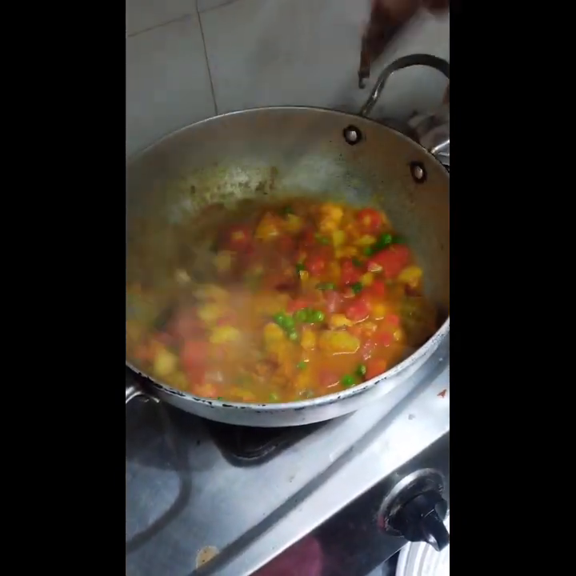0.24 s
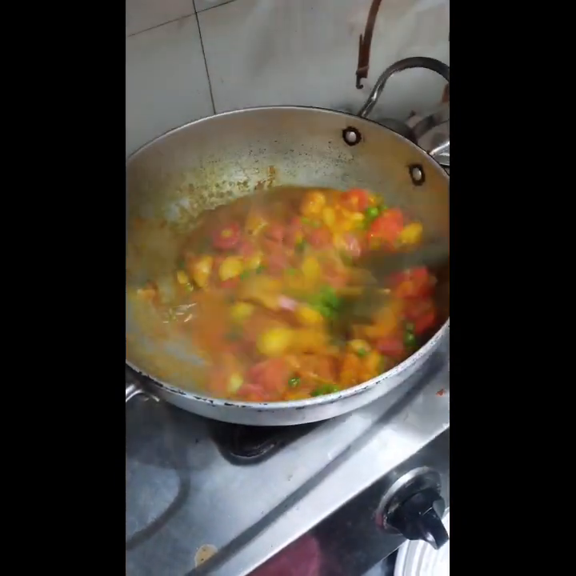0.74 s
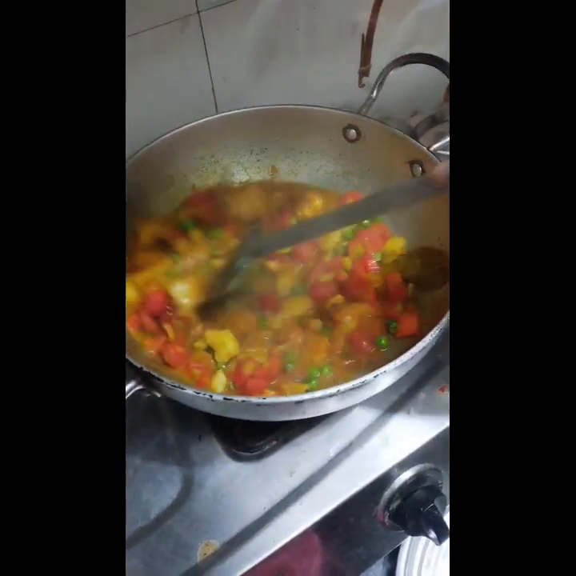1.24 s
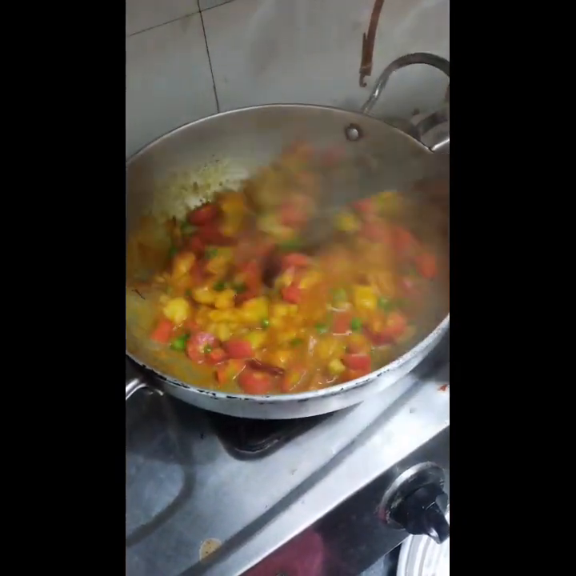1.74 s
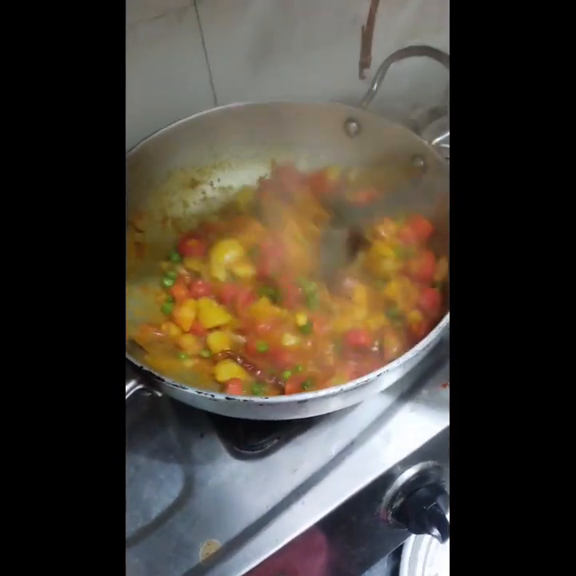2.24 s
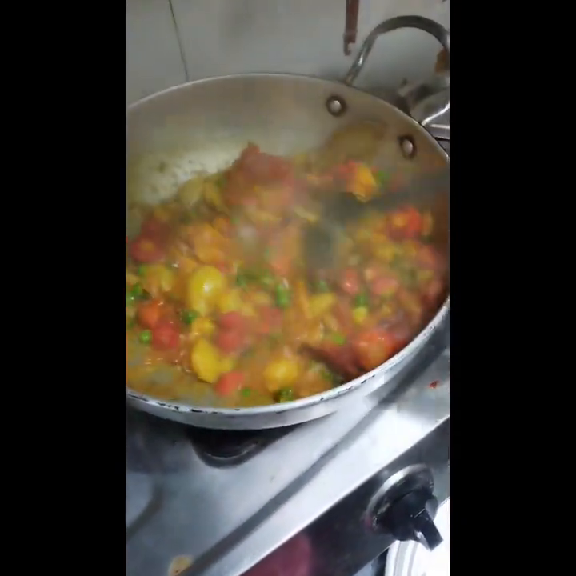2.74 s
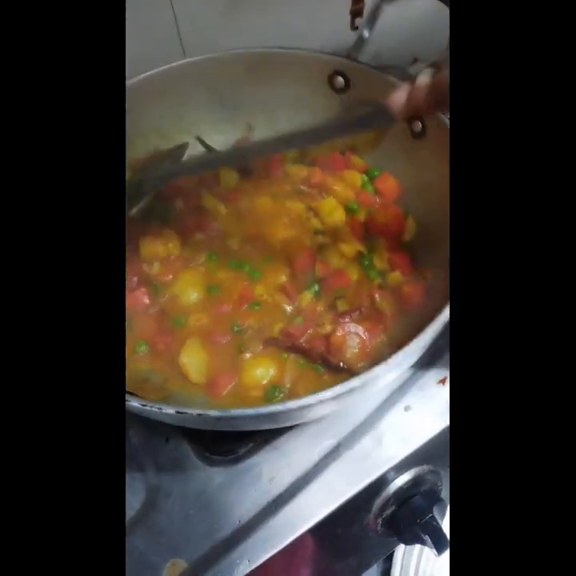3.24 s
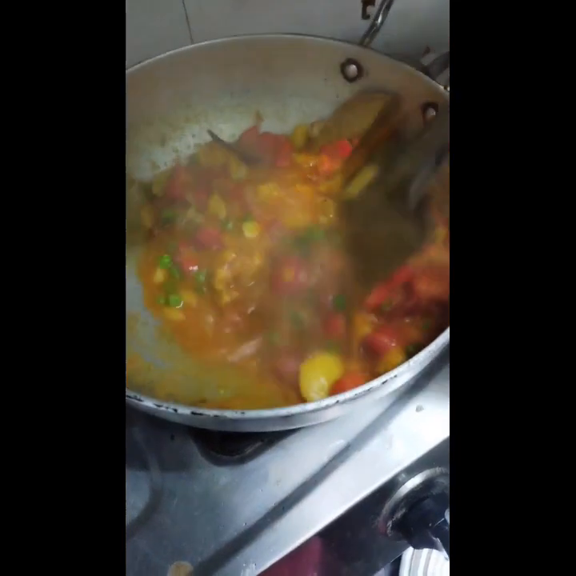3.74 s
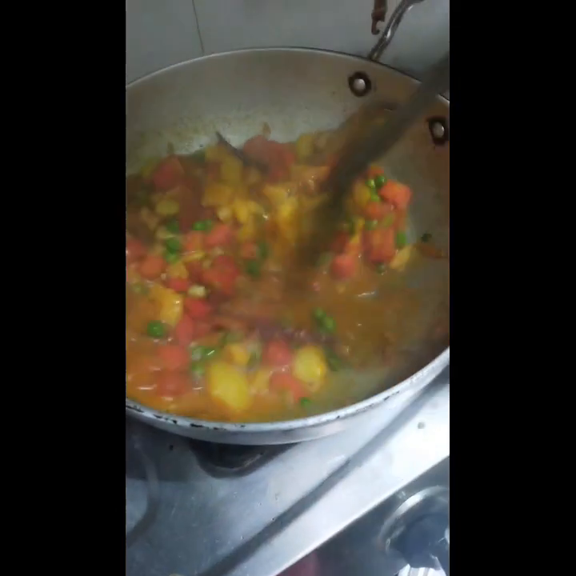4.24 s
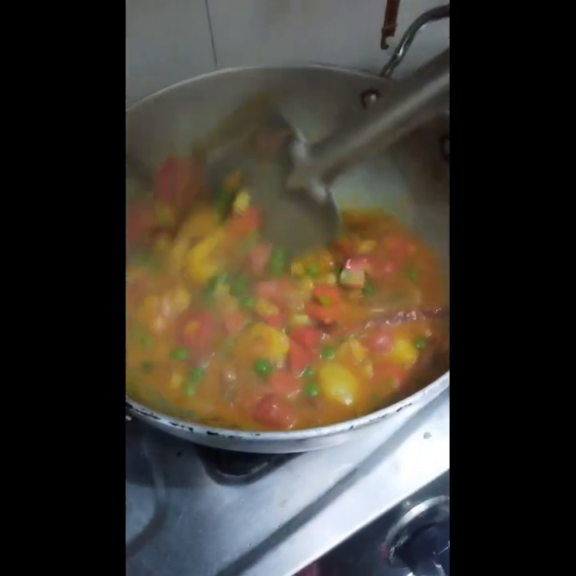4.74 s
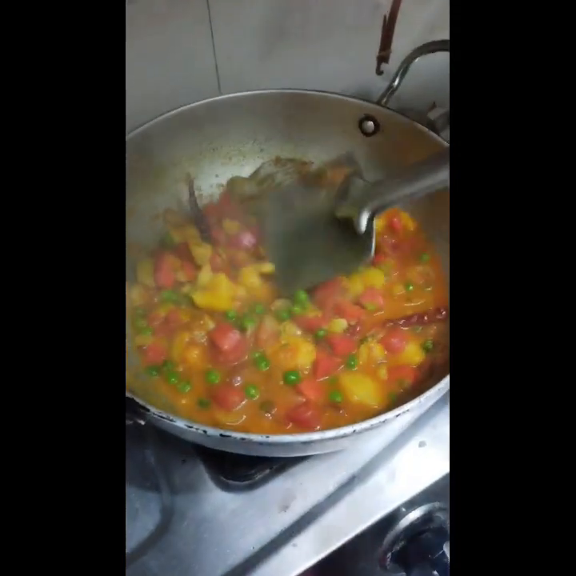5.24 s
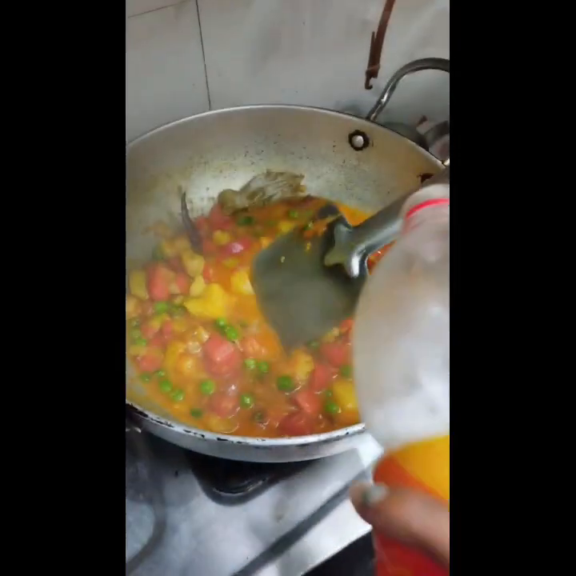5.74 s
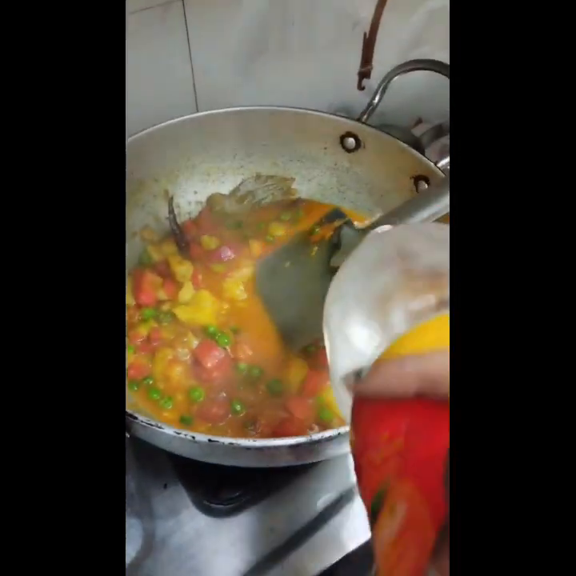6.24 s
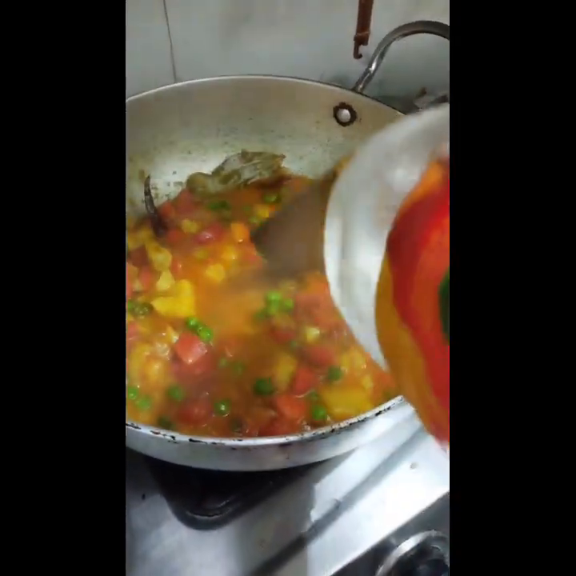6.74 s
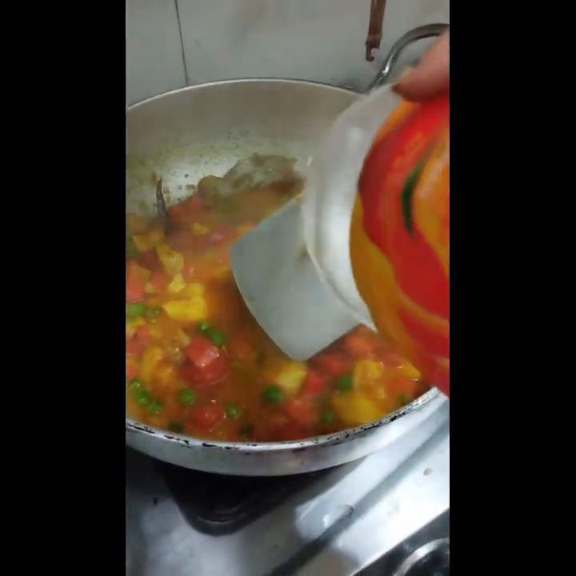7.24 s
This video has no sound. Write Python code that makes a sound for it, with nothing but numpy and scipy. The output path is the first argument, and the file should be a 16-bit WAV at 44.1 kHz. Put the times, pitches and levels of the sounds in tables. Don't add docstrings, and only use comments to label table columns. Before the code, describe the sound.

A close, bright pickup in a tiled kitchen. Fine steam fizz from simmering stew runs throughout, lively at first and gentler later, over faint hum and deep handling rumble. At 0-0.1 s a steel spatula knocks hard twice on the metal pan, then rasps until 0.5 s with ringing pan notes. From 0.95 to 3.1 s softer stirring strokes hiss and rub, with small loose-handle ticks. At 3.46 s a dull knock leads into harsh, shrieking scrapes until 3.75. Ringing double knock at 4.12, loudest sharp blows at 4.6, then brief scraping. Between 5.27 and 5.6 bangles clink lightly; a farther tray clatters at 5.65, and a strong bangle clink lands at 5.89. A sharp skid at 6.1, a lid bang at 6.3 with short room decay. From 6.6 to 7.5 a bottle gives uneven low, hollow glugs with sloshing and tiny droplet spits.

```python
import sys
import numpy as np
from scipy import signal
from scipy.fft import rfft, irfft, next_fast_len
from scipy.io import wavfile
from scipy.ndimage import uniform_filter1d

SR = 44100
rng = np.random.default_rng(int(sys.argv[2]) if len(sys.argv) > 2 else 0)


def volts_from_decibels(level):
    exponent = np.asarray(level, float) / 20
    return 10 ** exponent


def file_out(sig):
    cols = np.atleast_2d(sig).T
    lim = np.clip(cols, -1, 1)
    pcm = np.round(lim * 32767).astype(np.int16)
    wavfile.write(sys.argv[1], SR, pcm)


N = 330303
CLOCK = np.arange(N) / SR

# hz, level_db per Hz
EDGE = [(2000, -61.5), (3500, -21.5), (5300, -14.5), (6500, -9), (8240, 1.5), (9570, -2), (11500, -9.5),
        (12500, -16), (15500, -18)]
# hz, level_db per Hz
BODY = [(88, -22), (170, -7), (296, -1.5), (500, -6.5), (1100, -4), (1800, -4.5), (2600, -6), (4100, -13),
        (6500, -12), (8450, -21), (14300, -120)]
# start_s, peak_db, body_share_db, t60_s, ring_db
BLOWS = [
    (0.0225, -7, -17.5, 0.11, -16),
    (0.027, -2, -19.5, 0.062, -13),
    (0.0871, -8.5, -22.5, 0.15, -5),
    (0.1035, -14, -24, 0.078, 4),
    (3.458, -12.5, 2, 0.047, -14.5),
    (4.115, -5, -19, 0.087, 2),
    (4.13, -5, -14.5, 0.094, 0.5),
    (4.5976, -1, -15.5, 0.054, -9),
    (4.6131, 2.5, -29.5, 0.063, 2),
]
DRAG_RISE_S, DRAG_T60_S = 0.0069, 0.25


def unit(x):
    return x / np.sqrt(np.mean(x ** 2) + 1e-20)


def along(points, hz):
    f, v = np.transpose(points)
    return np.interp(np.log(hz + 1), np.log(f + 1), v)


def filtered(x, response):
    m = next_fast_len(len(x) + 8192)
    return irfft(rfft(x, m) * response(np.fft.rfftfreq(m, 1 / SR)), m)[:len(x)]


def gritty(spectrum, per_s, grit, patchy_db, peaks=()):
    impacts = (rng.random(N) < per_s / SR) * rng.standard_normal(N)
    source = np.sqrt(grit) * unit(impacts) + np.sqrt(1 - grit) * rng.standard_normal(N)
    z = signal.stft(source, nperseg=512)[2]
    field = uniform_filter1d(rng.standard_normal(z.shape), size=3, axis=0)
    field = uniform_filter1d(field, size=5, axis=1)
    x = signal.istft(z * volts_from_decibels(patchy_db * unit(field)), nperseg=512)[1][:N]

    def colour(f):
        lift = 1 + sum(volts_from_decibels(db - 0.5) / (1 + (2 * (f - c) / w) ** 2) for c, w, db in peaks)
        return volts_from_decibels(along(spectrum, f)) * lift
    return unit(filtered(x, colour))


def swell(t, rise, t60):
    growth = np.sin(np.pi / 2 * np.clip(t / max(rise, 1e-4), 0, 1)) ** 2
    return growth * volts_from_decibels(-60 * np.maximum(t - rise, 0) / max(t60, .01))


def held(s, hold, rise, t60):
    out = np.zeros(N)
    t = CLOCK[:min(N, round((hold + rise + 1.5 * t60) * SR))]
    fade = swell(np.maximum(t - hold, rise), rise, t60)
    shape = np.where(t < rise, swell(t, rise, t60), fade) ** 2
    add(out, s, shape[max(-round(s * SR), 0):])
    return out


def levels(rows):
    s, *cols = np.transpose(rows)
    return [volts_from_decibels(np.interp(CLOCK, s, c)) for c in cols]


def add(track, s, x):
    part = track[max(round(s * SR), 0):][:len(x)]
    part += x[:len(part)]


def cut(x, s, t):
    return x[round(s * SR):][:len(t)]


def ring(modes, scatter_db, rise=0.0013, since=None):
    t = np.arange(SR // 2) / SR
    luck = rng.standard_normal((len(modes), 2))
    out = 0
    for (hz, db, t60), (a, b) in zip(modes, luck):
        phase = 9 * b if since is None else 2 * np.pi * hz * since + hz
        out = out + volts_from_decibels(db + scatter_db * a) * swell(t, rise, t60) * np.sin(2 * np.pi * hz * t + phase)
    return out


def patch(hold, hz, width_hz, rise, t60):
    t = CLOCK[:SR // 2]

    def twice(f):
        return (1j * f * width_hz / (hz * hz - f * f + 1j * f * width_hz)) ** 2
    return np.sqrt(held(0, hold, rise, t60)[:len(t)]) * unit(filtered(rng.standard_normal(len(t)), twice))


def kitchen(x):
    # hz, t60_s
    walls = [(200, 0.62), (1000, 0.26), (10000, 0.26)]
    hz, t, z = signal.stft(rng.standard_normal(SR // 2), SR, nperseg=256)
    tail = signal.istft(z * volts_from_decibels(-60 * t / along(walls, hz)[:, None]), SR, nperseg=256)[1]
    return signal.fftconvolve(np.pad(x, (250, 0)), tail / np.linalg.norm(tail))[:N]


def house_hum():
    # start_s, length_s, level_db
    bustle = [
        (0, 0.17, -51.5),
        (.6, 2.57, -59),
        (4.2, 2.1, -55.5),
    ]
    # hz, level_db per Hz
    hum = [(90, -34), (170, -2), (300, -1), (500, -9), (1000, -11.5), (1600, -9), (2500, -16.5),
           (3500, -20), (5200, -43), (8800, -120)]
    power = volts_from_decibels(2 * -63.5) + sum(volts_from_decibels(2 * db) * held(s - .2, hold, 0.11, 1.2) for s, hold, db in bustle)
    return np.sqrt(power) * gritty(hum, 260, grit=0.05, patchy_db=2.2)


def rumble():
    # start_s, level_db
    hand = [
        (0.0, -58),
        (7.18, -45.5),
        (7.49, -48),
    ]
    # start_s, level_db
    shakes = [(.03, -48), (.93, -44.5), (1.34, -44.5), (1.98, -47.5), (2.58, -46.5), (3.45, -37.5),
              (3.55, -37), (4.09, -45.5), (4.7, -41), (5.66, -37.5), (6.03, -45.5), (6.6, -54),
              (7.0, -45.5), (7.4, -47)]
    deep = [(12, -11), (26, 1.5), (36, -2), (50, -23), (70, -69)]
    stove = [(29, -38), (50, -19), (64, 1.5), (86, -3.5), (118, 0), (157, -4.5), (180, -21), (230, -36.5),
             (400, -120)]
    grip = levels(hand)[0]
    power = (volts_from_decibels(-4) * grip) ** 2
    power = power + sum(volts_from_decibels(2 * db) * held(s, 0, 0.05, 1.06) for s, db in shakes)
    upper = np.sqrt(power) * volts_from_decibels(-2.0) * gritty(stove, 40, grit=0.087, patchy_db=1.0)
    return grip * gritty(deep, 39.9, grit=0.1, patchy_db=5.5) + upper


def simmer():
    # start_s, level_db
    boil = [
        (0, -41.5),
        (.7, -46.5),
        (3.3, -48.5),
        (6.2, -51),
        (7.49, -50),
    ]
    # hz, level_db per Hz
    fizz = [(2000, -20), (3500, -21), (5500, -15), (7000, -9), (8900, -1), (10500, -9.5), (12800, -16),
            (15400, -19.5)]
    return levels(boil)[0] * gritty(fizz, 1500, grit=0.15, patchy_db=1.2)


def far_tray():
    # hz, level_db per Hz
    clatter = [(120, -62), (220, -15), (440, -23), (520, -14), (1140, -9), (1400, -14.5), (1950, -10.5),
               (3000, -17.5), (4500, -24), (6500, -24), (9000, -15), (11500, -27.5), (15400, -41)]
    # late_s, pitch_hz, level_db, t60_s
    tray = [(0.00203, 1145, -26, .2), (0.01003, 574, -23.5, 0.35), (.018, 688, -19, 0.4),
            (.012, 930, -26.5, .3), (.025, 1110, -23, .25), (.025, 1188, -23, 0.36),
            (.015, 1860, -25, 0.19), (.025, 1990, -28, .15), (.025, 2155, -29, .15),
            (0.0195, 2391, -31, .4), (.02, 2585, -29, .2), (0.011, 3200, -31, .12), (.06, 520, -28, 0.23),
            (.075, 1015, -27, 0.24), (.07, 1722, -32, 0.22), (.1, 500, -31, 0.57), (.11, 1630, -37, .5),
            (.13, 700, -36, .6), (.12, 930, -34, .5)]
    start_s, level_db = 5.646, -17
    touch = volts_from_decibels(-12.5) * swell(CLOCK - start_s + .011, 0.0035, 0.37)
    contact = swell(CLOCK - start_s, .027, .48) + touch
    notes = np.zeros(N)
    for late, *mode in tray:
        add(notes, start_s + late, ring([mode], scatter_db=0, rise=0.018))
    caught = np.sqrt(held(start_s, 0.26, .002, .12))
    return volts_from_decibels(level_db - 2.5) * contact * gritty(clatter, 4300, grit=0.064, patchy_db=1.5) + notes * caught


def far_lid():
    # hz, level_db per Hz
    lid = [(88, -57), (236, -17.5), (400, -9.5), (1090, -1), (1600, -1.5), (2100, -1.5), (2700, -5.5),
           (3500, -11), (6800, -11.5), (8500, -6), (11000, -11.5), (12500, -24.5), (15400, -25.5)]
    t, rise_s, level_db = CLOCK - 6.2993, .001, -9.5
    slam = swell(t, rise_s, 0.042) + volts_from_decibels(0.5) * swell(t, rise_s, .27) + volts_from_decibels(-20.5) * swell(t, rise_s, 0.53)
    return volts_from_decibels(level_db - 2.5) * slam * gritty(lid, 2500, grit=0.38, patchy_db=2.0)


def worktop_bumps():
    # start_s, length_s, pitch_hz, level_db
    bumps = [
        (.08, 0.074, 160, -47.5),
        (2.052, .12, 125, -53),
        (5.72, 0.097, 125.6, -45.5),
        (6.084, 0.029, 108, -43),
        (6.358, 0.059, 222, -51.5),
    ]
    out = np.zeros(N)
    for s, hold, hz, db in bumps:
        add(out, s, volts_from_decibels(db) * patch(hold, hz, hz / 5.4, 0.016, 0.32))
    return out


def droplets():
    # start_s, pitch_hz, level_db
    spits = [(5.271, 14200, -40), (5.285, 14800, -44), (5.26, 3000, -51), (6.838, 6330, -47),
             (6.915, 10500, -46), (6.953, 8600, -46), (6.97, 10800, -49), (6.993, 12500, -49),
             (7.033, 8600, -45), (7.19, 11000, -45.5), (7.327, 9000, -52), (7.355, 7030, -41),
             (7.357, 11300, -47), (6.765, 8200, -46)]
    out = np.zeros(N)
    for s, hz, db in spits:
        add(out, s, volts_from_decibels(db) * patch(.004, hz, hz / 4.5, .002, 0.041))
    return out


def bottle_glugs():
    # start_s, peak_db, neck_overtone_db, pitch_hz
    glugs = [
        (6.612, -37.5, 6.5, 290),
        (6.754, -33, -15.5, 290),
        (6.907, -27.5, -15, 283),
        (7.033, -49, 2, 280),
        (7.19, -28.5, -20, 276),
        (7.324, -41, -12, 298),
        (7.44, -37.5, -14, 292),
    ]
    # pitch_hz, level_db, t60_s
    neck = [(506, 2, 0.053), (660, -7, 0.055), (820, -17.5, 0.042)]
    # hz, level_db per Hz
    slosh = [(100, -27), (220, 2), (300, -10), (500, -4), (800, -13.5), (1100, -49), (3000, -58.5)]
    out, t = np.zeros(N), CLOCK[:SR // 4]
    sloshing = gritty(slosh, 230, grit=.3, patchy_db=2.0)
    for s, db, neck_db, hz in glugs:
        add(out, s, ring([(hz, db, .085)], scatter_db=-1, rise=0.0042))
        add(out, s, volts_from_decibels(db + neck_db) * ring(neck, scatter_db=0.0, rise=0.0028))
        add(out, s, volts_from_decibels(db - 17.5) * swell(t, 0.0034, .06) * rng.standard_normal(len(t)))
        water = cut(sloshing, s, t)
        add(out, s, volts_from_decibels(db - 14.0) * swell(t, 0.0065, 0.24)[:len(water)] * water)
    return out


def bangles():
    # start_s, peak_db, ring length over a free clink
    clinks = [(5.27, -19.5, 1), (5.279, -27.5, 1.2), (5.344, -20, 0.61), (5.4257, -30, .7),
              (5.469, -32, .4), (5.476, -25, 1.2), (5.5417, -20, 1.2), (5.551, -27, 1.1),
              (5.564, -19.5, 1.05), (5.573, -34, 1), (5.889, -10.5, 0.75)]
    # pitch_hz, level_db, t60_s
    bangle = [(5160, -14, 0.036), (5900, -21, 0.088), (8270, -3.5, 0.044), (8680, -15, 0.054),
              (9140, -0.5, 0.058), (9700, 0.5, 0.079), (10800, -9, 0.045), (11470, -14, .05),
              (12900, -11, .045), (14860, -17, 0.032), (15400, -24, .05)]
    out, t = np.zeros(N), CLOCK[:SR // 4]
    crack = gritty(EDGE, 3000, grit=0.35, patchy_db=1.5)
    thud = gritty(BODY, 2500, grit=0.34, patchy_db=1.5)
    for s, db, lasts in clinks:
        modes = [(hz, g, lasts * life) for hz, g, life in bangle]
        add(out, s, volts_from_decibels(db - 9.5) * ring(modes, scatter_db=2.0))
        add(out, s, volts_from_decibels(db - 16.0) * swell(t, 0.00085, 0.053) * cut(crack, s, t))
        add(out, s - .006, volts_from_decibels(db - 26.0) * swell(t, 0.015, 0.048) * cut(thud, s, t))
    return out


def handle_ticks():
    # start_s, peak_db
    ticks = [(1.014, -21), (1.0934, -32), (1.1286, -35), (1.3833, -20.5), (1.4238, -21.5), (1.9062, -30),
             (2.609, -42), (2.6432, -34), (3.8375, -38), (3.855, -30.5), (3.894, -36), (3.936, -34.5),
             (4.2905, -32.5), (4.326, -28), (4.5426, -34.5), (5.2886, -29.5), (5.433, -40), (5.4832, -30),
             (5.521, -38), (5.613, -41), (5.891, -32), (6.0748, -36), (6.119, -29.5)]
    # pitch_hz, level_db, t60_s
    handle = [(1082, 0.5, 0.06), (1626, -10, .04), (2020, -10.5, 0.044)]
    out, t = np.zeros(N), CLOCK[:SR // 4]
    thud = gritty(BODY, 2500, grit=0.34, patchy_db=1.5)
    for s, db in ticks:
        add(out, s, volts_from_decibels(db - 3.0) * ring(handle, scatter_db=3.0, rise=0.0011))
        add(out, s, volts_from_decibels(db - 16.0) * swell(t, 0.0029, 0.064) * rng.standard_normal(len(t)))
        add(out, s, volts_from_decibels(db - 14.5) * swell(t, 0.0027, 0.081) * cut(thud, s, t))
    return out


def rasps():
    # start_s, contact_s, pitch_hz, width_hz, level_db
    wet_patches = [(.03, .012, 690, 120, -36), (.09, .03, 2440, 120, -37), (.145, .03, 1750, 250, -44),
                   (.27, .05, 1300, 120, -34), (.29, 0.1, 735, 90, -39), (.33, 0.051, 870, 90, -38),
                   (.29, .04, 1170, 90, -42), (.27, 0.037, 1930, 90, -38), (0.339, .05, 1275, 150, -37),
                   (.96, .03, 1800, 500, -35.5), (.99, .01, 300, 100, -35.5),
                   (1.37, 0.067, 1850, 350, -38.5), (1.4, 0.029, 2600, 250, -40),
                   (1.45, 0.018, 1060, 200, -41), (1.6, .1, 820, 150, -47), (1.66, 0.037, 1700, 400, -44),
                   (1.864, .02, 2500, 350, -36), (1.9, 0.04, 1040, 200, -42), (1.9, 0.071, 620, 90, -46.5),
                   (1.97, 0.065, 1060, 100, -45), (1.98, 0.094, 280, 70, -48), (2.14, .08, 1600, 400, -50),
                   (2.45, .07, 1710, 400, -39), (2.55, 0.023, 282, 90, -41), (2.7, .05, 1730, 200, -44.5),
                   (2.814, 0.028, 1550, 350, -40), (2.968, 0.038, 1780, 200, -32.5),
                   (2.97, .02, 2650, 250, -38), (2.99, .02, 3550, 150, -42), (3.03, .04, 410, 60, -41.5),
                   (3.545, 0.1, 1460, 600, -34.5), (4.615, 0.043, 1765, 80, -35),
                   (4.66, 0.034, 1880, 60, -38), (4.715, 0.051, 1800, 130, -40),
                   (4.72, .02, 2290, 100, -38), (4.74, .05, 1030, 150, -44), (4.77, 0.021, 2400, 100, -48),
                   (4.82, 0.053, 1500, 300, -42.5), (4.84, 0.042, 1930, 300, -50)]
    out = np.zeros(N)
    for s, hold, hz, width_hz, db in wet_patches:
        add(out, s, volts_from_decibels(db) * patch(hold, hz, width_hz, 0.0047, .09))
    return out


def skims():
    # start_s, contact_s, level_db
    strokes = [
        (0.951, 0.044, -38),
        (4.66, 0.1, -44),
        (1.87, 0.026, -36),
        (2.45, 0.053, -40.5),
        (2.966, 0.07, -34.5),
    ]
    # hz, level_db per Hz
    wall = [(900, -28), (1500, -7), (2000, -4.5), (3300, -10), (5000, -25.5)]
    power = sum(volts_from_decibels(2 * db) * held(s, hold, DRAG_RISE_S, DRAG_T60_S) for s, hold, db in strokes)
    return np.sqrt(power) * gritty(wall, 2500, grit=0.17, patchy_db=2.2)


def blade_power():
    # start_s, contact_s, edge_hiss_db, pan_body_db
    drags = [(.11, 0.13, -29, -32.5), (0.267, 0.12, -33.5, -30), (.941, 0.022, -33.5, -37.5),
             (.968, 0.07, -34.5, -34), (1.165, 0.19, -35.5, -51), (1.358, 0.097, -30.5, -35.5),
             (1.5, 0.18, -39.5, -47.5), (1.621, 0.066, -39, -39.5), (1.7, 0.085, -38.5, -48.5),
             (1.78, 0.083, -35.5, -44), (1.866, 0.073, -29.5, -34), (1.96, 0.22, -33, -42),
             (2.2, 0.14, -35, -41.5), (2.38, 0.3, -39, -44.5), (2.447, 0.12, -54, -38.5),
             (2.695, 0.064, -35, -39.5), (2.815, 0.049, -38, -43), (2.936, 0.07, -39.5, -43),
             (2.975, 0.073, -36.5, -37.5), (3.544, 0.063, -30, -27.5), (3.67, 0.071, -27.5, -33),
             (3.77, 0.055, -39, -39), (4.455, 0.023, -41, -53), (4.485, 0.096, -37, -48.5),
             (4.64, 0.052, -32, -40), (4.709, 0.041, -27, -31.5), (4.769, 0.064, -36, -34)]
    # start_s, contact_s, edge_hiss_db, pan_body_db
    jabs = [
        (.983, 0.011, -21, -34),
        (1.919, 0.0095, -26.5, -35.5),
        (3.472, 0.023, -31.5, -30),
        (3.523, 0.014, -14.5, -26),
        (3.574, 0.0067, -23, -40),
        (3.597, 0.006, -16.5, -40),
        (3.632, 0.01, -15, -36),
        (3.642, 0.02, -12.5, -36),
        (3.722, 0.017, -25.5, -43),
    ]
    # start_s, peak_db, body_share_db
    skids = [(1.163, -25, -30), (1.612, -19.5, -4.5), (1.7887, -21, -29), (1.8694, -36, -23),
             (2.6945, -21, -4), (2.813, -24, -4), (2.9665, -24, -17), (3.1194, -39, -15), (4.314, -22, -16),
             (4.37, -39.5, 6), (4.4, -39, 4), (5.555, -43, 5), (4.99, -29, -1.5), (5.7386, -35, 5),
             (6.097, -12.5, -21.5), (6.488, -17, -16), (6.5366, -24, -28), (7.0315, -31.5, -15),
             (7.3374, -23.5, -13.5)]
    skid_rise_s, skid_t60_s = 0.0031, 0.084
    hiss, body, t = np.zeros(N), np.zeros(N), CLOCK[:SR // 2]
    contacts = [(held(s, hold, DRAG_RISE_S, DRAG_T60_S), *dbs) for s, hold, *dbs in drags]
    contacts += [(held(s, hold, .014, .055), *dbs) for s, hold, *dbs in jabs]
    for touch, edge_db, body_db in contacts:
        hiss += volts_from_decibels(2 * edge_db) * touch
        body += volts_from_decibels(2 * body_db) * touch
    for s, db, body_db in skids:
        add(hiss, s, (volts_from_decibels(db - 12.0) * swell(t, skid_rise_s, skid_t60_s)) ** 2)
        add(body, s, (volts_from_decibels(db + body_db - 10.5) * swell(t, skid_rise_s, 1.5 * skid_t60_s)) ** 2)
    for s, db, body_db, t60, _ in BLOWS:
        add(hiss, s, (volts_from_decibels(db - 7.0) * swell(t, 0.0025, t60)) ** 2)
        add(body, s, (volts_from_decibels(db + body_db - 2.5) * swell(t, 0.003, 2.26 * t60)) ** 2)
    return hiss, body


def pan_notes(pan):
    # start_s, pitch_hz, level_db, rise_s
    sings = [(.1, 3010, -36, .02), (.2, 3010, -38, .03), (.35, 3010, -40, .03), (.21, 3640, -32, .03),
             (.21, 1233, -36, .04), (.38, 2630, -40, .03), (.35, 4540, -38, .02), (.37, 1233, -32, .045),
             (.37, 1873, -33, .045), (.6, 242, -54, .1), (3.465, 1873, -28, .01), (3.48, 2302, -34, .02),
             (3.485, 3010, -30, .015), (4.16, 1873, -30, .06), (4.15, 2302, -38, .03),
             (4.14, 3010, -36, .02), (4.15, 1233, -40, .02), (4.19, 242, -48, .08), (4.605, 3385, -26, .02),
             (4.6, 4740, -29, .02), (4.61, 3010, -31, .02), (4.62, 3820, -37, .03), (4.64, 2302, -37, .02),
             (4.61, 1233, -30, .035), (.31, 1873, -37, .02), (4.125, 3385, -28, .015)]
    # start_s, pitch_hz, level_db
    chirps = [(2.455, 1690, -38), (2.69, 703, -30.5), (2.963, 1766, -25.5), (3.031, 403, -39.5),
              (3.46, 1228, -12.5), (3.461, 1580, -24.5), (4.6, 2450, -22), (4.619, 2440, -30.5),
              (6.77, 2680, -59), (7.044, 2430, -57), (7.296, 1330, -48.5)]
    food_back_s = 4.5
    lives = [(hz, t60) for hz, _, t60 in pan]
    out = np.zeros(N)
    for s, db, body_db, _, ring_db in BLOWS:
        damping = .5 if s > food_back_s else 1
        modes = [(hz, g, life * damping) for hz, g, life in pan]
        add(out, s, volts_from_decibels(db + body_db + ring_db - 2.5) * ring(modes, scatter_db=0.5, since=s))
    for s, hz, db, rise in sings:
        t60 = 1.1 * along(lives, hz)
        if s > food_back_s:
            t60 = min(t60, .2)
        add(out, s, ring([(hz, db, t60)], scatter_db=0.5, rise=rise, since=s))
    for s, hz, db in chirps:
        add(out, s, ring([(hz, db, 0.05)], scatter_db=0.5, rise=0.0083))
    return out


def spatula():
    # pitch_hz, width_hz, level_db
    belly = [(292, 32, -1.5), (740, 95, -5.5), (1092, 39, 2), (1760, 164, -2.5), (2600, 95, -5),
             (3570, 100, 3.5), (4760, 380, -1)]
    pan_hz = [242, 452, 742, 1233, 1873, 2302, 2462, 2630, 3010, 3385, 3820, 4440, 7900, 9600]
    # level_db, t60_s
    pan_ring = [(-15.5, .8), (-6, .18), (-9, .16), (-10, .42), (-6, .27), (-10, .2), (-10, .1), (-9, .07),
                (-8, .14), (-2, .09), (-14, .12), (-6, .09), (-.5, .072), (-21, .05)]
    # start_s, length_s, level_db
    bare = [
        (0.083, 0.31, -46),
        (3.5, 0.24, -51),
        (4.62, 0.165, -49),
    ]
    pan = [(hz, *mode) for hz, mode in zip(pan_hz, pan_ring)]
    hiss, body = blade_power()
    edge = volts_from_decibels(-0.5) * np.sqrt(hiss) * gritty(EDGE, 4000, grit=0.35, patchy_db=2.5)
    rub = np.sqrt(body) * gritty(BODY, 2500, grit=0.35, patchy_db=2.2, peaks=belly) + skims()
    drive = np.sqrt(volts_from_decibels(2 * -55) + sum(volts_from_decibels(2 * db) * held(s, hold, .02, .1) for s, hold, db in bare))
    alive = signal.fftconvolve(drive * rub, ring(pan, scatter_db=1))[:N]
    return edge + rub + pan_notes(pan) + alive


def scene():
    near = spatula() + rasps() + handle_ticks() + bangles() + bottle_glugs() + droplets() + worktop_bumps()
    far = far_tray() + far_lid()
    background = simmer() + house_hum() + rumble()
    return (near + volts_from_decibels(-10.5) * kitchen(near) + far + background)[None]


def band_limit(x):
    return signal.sosfilt(signal.butter(12, 16820, fs=SR, output="sos"), x)


def record(dry):
    x = dry[0] / (1 + np.abs(dry[0] / .86) ** 6) ** (1 / 6)
    x = filtered(x, lambda hz: np.where(hz < 15500, 1, volts_from_decibels(-49.5)))
    return band_limit(x[None])


dry = scene()
out = record(dry)
file_out(out)
```